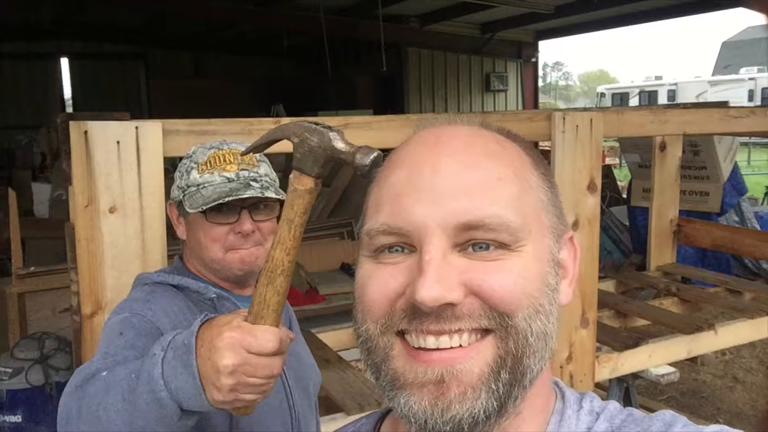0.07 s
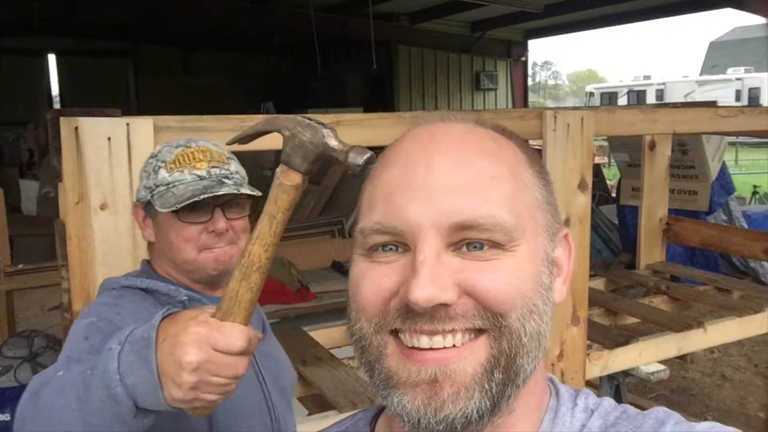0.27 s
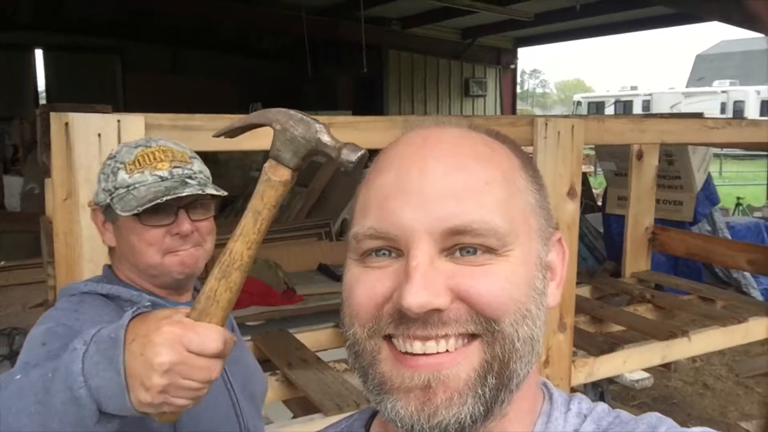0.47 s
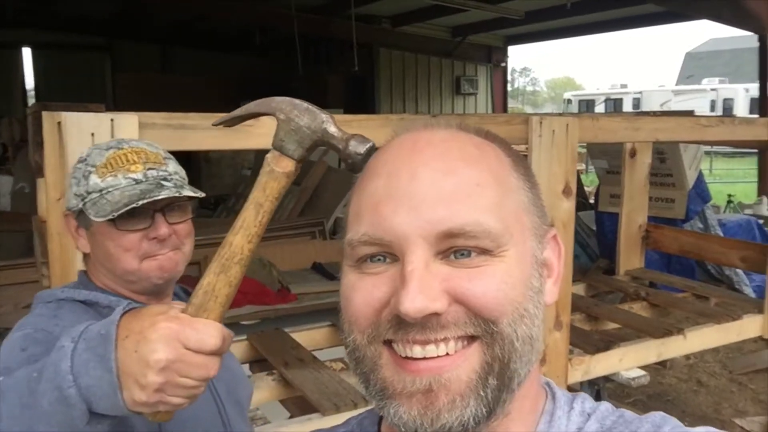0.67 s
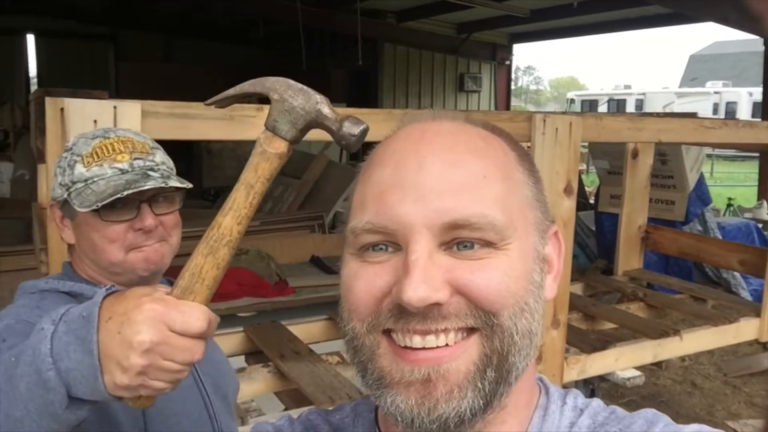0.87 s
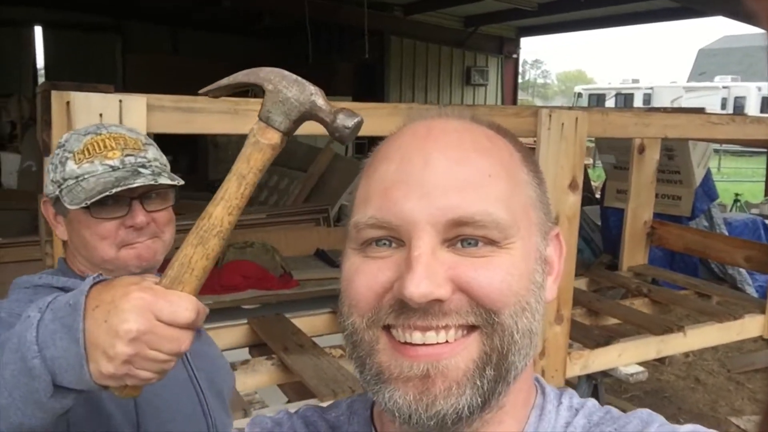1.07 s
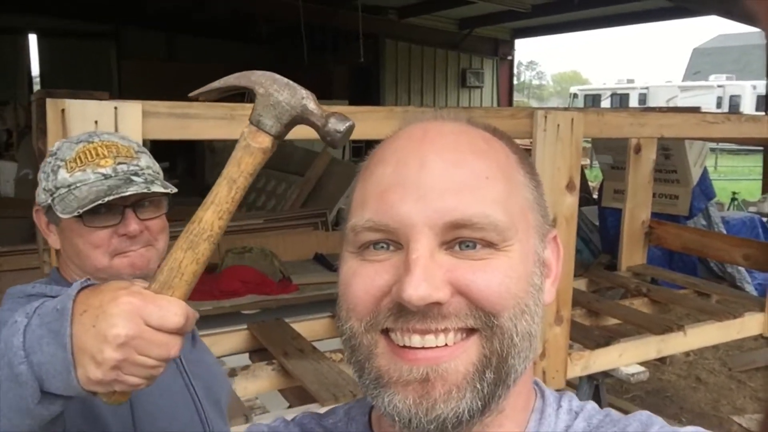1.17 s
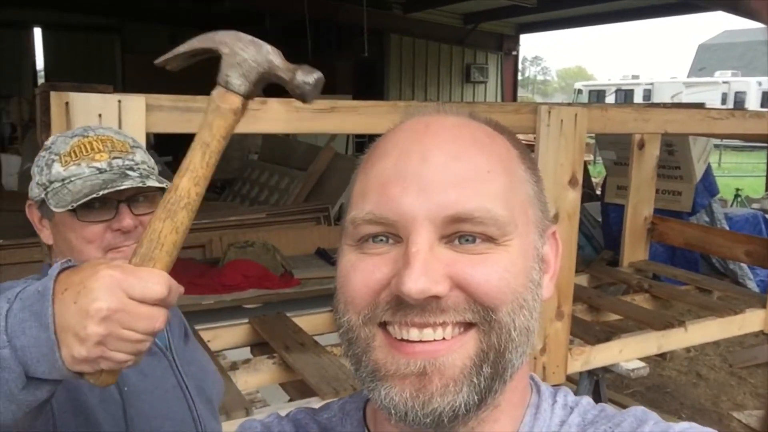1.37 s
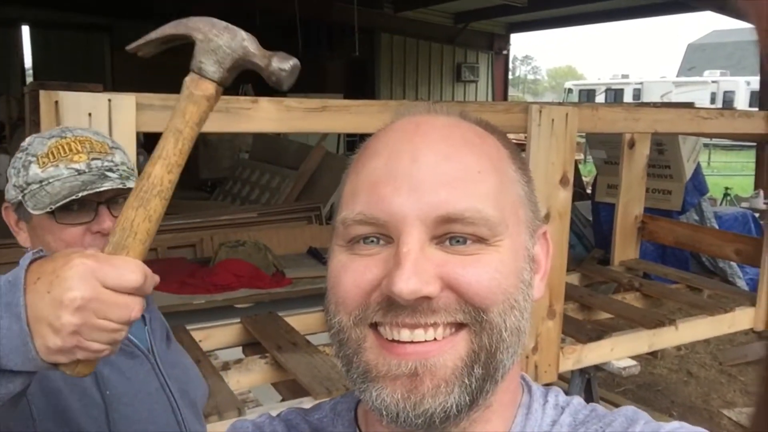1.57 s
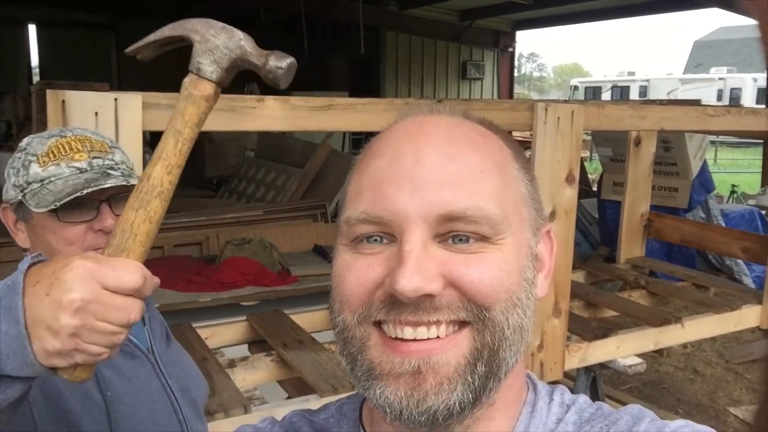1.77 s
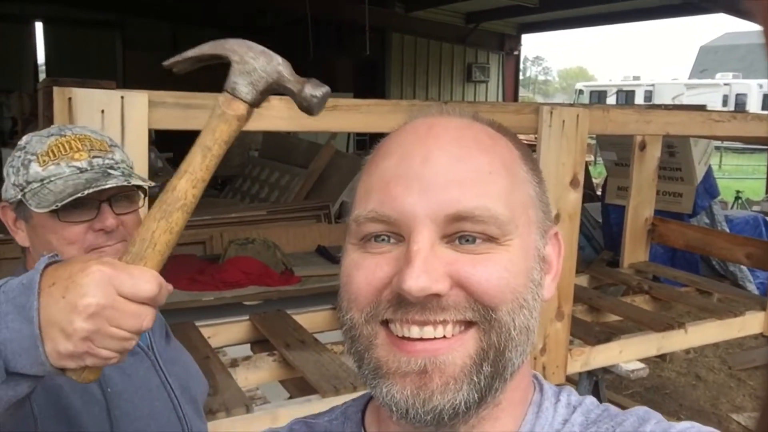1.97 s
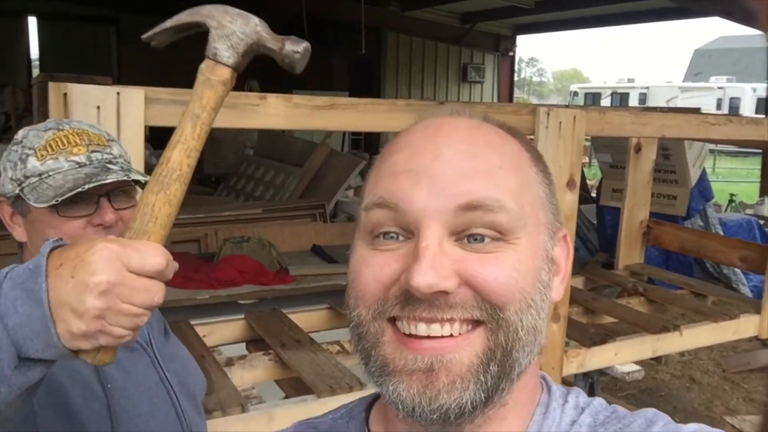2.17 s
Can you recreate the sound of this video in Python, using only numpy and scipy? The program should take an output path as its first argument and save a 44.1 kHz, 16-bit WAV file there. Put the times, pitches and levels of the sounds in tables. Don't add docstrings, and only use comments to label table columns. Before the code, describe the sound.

Water runs and spatters off the eaves throughout, with small bubbling drips and fine hiss. A low lumpy rumble lies beneath, and a single dull thud comes early, picked up by one microphone under the roof.

```python
import sys
import numpy as np
from scipy import signal
from scipy.fft import rfft, irfft, next_fast_len
from scipy.io import wavfile
from scipy.ndimage import uniform_filter1d, map_coordinates

SR = 44100
rng = np.random.default_rng(int(sys.argv[2]) if len(sys.argv) > 2 else 0)


def bounce(signal):
    frames = np.transpose(np.atleast_2d(signal))
    limited = np.clip(frames, -1, 1)
    pcm = np.round(limited * 32767).astype(np.int16)
    wavfile.write(sys.argv[1], SR, pcm)


def boost(x):
    u = np.asarray(x, float) / 20
    return 10 ** u


N = 98254
T = np.arange(N) / SR


def unit(x):
    return x / np.sqrt(np.mean(x ** 2) + 1e-20)


def coloured(x, points):
    m = next_fast_len(N + 8192)
    hz, db = np.transpose(points)
    bins = np.fft.rfftfreq(m, 1 / SR)
    gain = boost(np.interp(np.log(bins + 1), np.log(hz + 1), db))
    return unit(irfft(rfft(x, m) * gain, m)[:N])


def wobble(rate):
    return map_coordinates(rng.standard_normal(2000), [np.clip(T * rate, 0, 1998)])


def patchy(patchy_db):
    z = signal.stft(rng.standard_normal(N + 512), nperseg=512)[2]
    field = uniform_filter1d(rng.standard_normal(z.shape), size=5, axis=0)
    field = uniform_filter1d(field, size=8, axis=1)
    return signal.istft(z * boost(patchy_db * unit(field)), nperseg=512)[1][:N]


def grains(count, hz, spread, cycles, scatter_db, rise):
    at, size = rng.random((2, count, 1))
    pitch = np.clip(hz * np.exp(spread * rng.standard_normal((count, 1))), 100, SR / 2.5)
    k = np.arange(1400)
    u = k / SR * pitch / cycles
    level = boost(-scatter_db * np.log(size + 1e-4))
    tone = np.sin(2 * np.pi * cycles * u * (1 + rise * u))
    wave = level * u * np.exp(-3 * u) * tone
    place = (at * N).astype(int) + k
    return unit(np.bincount(place.ravel(), wave.ravel(), N + k.size)[:N])


def swell(s, length):
    return np.exp(-.5 * ((T - s) / (.5 * length)) ** 2)


def blip(s, hz, db, length, rise):
    t = T - s
    glide = 1 + .5 * rise * np.clip(t / length, -2, 2)
    return boost(db) * swell(s, length) * np.cos(2 * np.pi * hz * t * glide)


def eaves_runoff(strength_db):
    # frequency in Hz, power in dB per Hz.
    runoff_spectrum = [(880, -47), (1500, -6), (1640, -12.5), (1950, 2.5), (2300, 4), (2650, -3),
                       (3970, -23), (5000, -34), (6500, -29), (11000, -120)]
    bubble_db = -6
    froth = coloured(grains(count=700, hz=2927, spread=.35, cycles=151, scatter_db=1.5, rise=0.02),
                     runoff_spectrum)
    splash = coloured(patchy(patchy_db=2.0), runoff_spectrum)
    return unit(splash + boost(bubble_db) * froth) * boost(strength_db + 0.78 * wobble(30.7))


def roof_patter(swing_db):
    # frequency in Hz, power in dB per Hz.
    roof_spectrum = [(110, -6), (190, -14), (209, -2.5), (460, -5.5), (633, -7), (743, -13), (1040, -2),
                     (1640, -13), (1800, -10), (2340, -52), (3960, -120)]
    # centre in seconds, level in dB, length in seconds.
    spills = [(0.246, -56, 0.06), (0.645, -62, 0.044), (0.94, -57, 0.032), (1.059, -55, 0.048),
              (1.135, -63, 0.052), (1.216, -58, 0.2), (1.47, -56.5, 0.025), (1.596, -51, 0.022),
              (1.687, -50, 0.018), (1.737, -53.5, 0.071), (1.915, -57.5, 0.059), (1.982, -55.5, 0.06)]
    roof_db, follows = -56, 0.42
    patter_db = -6.5
    patter = grains(count=1200, hz=807.6, spread=0.5554, cycles=19.0, scatter_db=2.5, rise=0.027)
    sheet = unit(coloured(patchy(patchy_db=2.5), roof_spectrum) + boost(patter_db) * patter)
    drumming = boost(2 * (roof_db + follows * swing_db))
    drumming = drumming + sum(boost(2 * db) * swell(s, length) ** 2 for s, db, length in spills)
    return sheet * np.sqrt(drumming)


def far_hiss(swing_db):
    # frequency in Hz, power in dB per Hz.
    hiss_spectrum = [(2500, -33), (4300, -7.5), (4900, -8), (6200, 2), (7000, -4.5), (9600, -6),
                     (10400, -10), (11900, -8.5), (15700, -17)]
    hiss_db, follows, flicker_db = -71, .25, .6
    tick_db = -23
    ticks = coloured(grains(count=1500, hz=9500, spread=0.84, cycles=13.0, scatter_db=3, rise=0.018),
                     hiss_spectrum)
    haze = unit(coloured(patchy(patchy_db=1.0), hiss_spectrum) + boost(tick_db) * ticks)
    return haze * boost(hiss_db + follows * swing_db + flicker_db * wobble(25.27))


def rain():
    # time in seconds, runoff strength in dB.
    rain_strength = [(0.2, -51), (0.24, -53), (0.5, -56.5), (0.54, -52), (0.62, -56.5), (0.72, -54),
                     (0.83, -58), (0.92, -53.5), (1.05, -57), (1.09, -53.5), (1.13, -54), (1.65, -54),
                     (1.67, -48.5), (1.77, -55.5), (1.97, -53), (2.07, -59.5), (2.1, -52), (2.22, -56.5)]
    s, db = np.transpose(rain_strength)
    strength_db = np.interp(T, s, db)
    swing_db = strength_db - strength_db.mean()
    return eaves_runoff(strength_db) + roof_patter(swing_db) + far_hiss(swing_db)


def rumble():
    # frequency in Hz, power in dB per Hz.
    rumble_spectrum = [(15, -41), (27, -21), (42, -3), (62, 1), (100, -5), (135, -8), (173, -9), (230, -23),
                       (400, -120)]
    # centre in seconds, pitch in Hz, level in dB.
    booms = [(0.181, 134.5, -47.5), (0.279, 100, -49), (0.359, 67.8, -38.5), (0.416, 73.5, -42),
             (0.437, 86, -43), (0.46, 135.5, -47), (0.581, 92.5, -48), (0.6, 188, -52), (0.655, 61, -51),
             (0.699, 165.5, -55.5), (0.705, 73.4, -44), (0.867, 74.4, -52.5), (0.915, 73.5, -45.5),
             (0.939, 174, -55.5), (0.999, 73.5, -47), (1.235, 77, -43.5), (1.291, 118, -51),
             (1.381, 87, -56), (1.464, 64.6, -49), (1.634, 60.7, -47.5), (1.704, 182, -52.5),
             (1.714, 89, -48), (1.761, 64, -49.5), (1.786, 118, -49.5), (1.955, 170, -50.5),
             (1.97, 88, -53), (2.018, 53.7, -50), (2.032, 168, -52), (2.051, 86, -47), (2.108, 67, -49),
             (2.188, 89.5, -51), (2.215, 167, -51),
             (0.213, 60, -45.5), (0.321, 104.0, -56), (0.471, 108, -48), (0.545, 112.0, -54.5),
               (0.604, 118.0, -51.5), (0.654, 56, -56), (0.71, 70, -46), (0.779, 107, -52.5),
               (0.935, 168, -52), (1.024, 165, -56), (1.069, 138, -56), (1.125, 151.0, -62),
               (1.17, 172.0, -64), (1.183, 127.0, -56), (1.277, 163, -53), (1.377, 78.5, -49),
               (1.447, 162, -59), (1.466, 118.0, -60.5), (1.479, 163.0, -56.5), (1.758, 191, -66),
               (1.923, 133, -60), (2.213, 140.0, -51.5)]
    bed_db, lumps_db, evenness = -53.5, 0.7, 0.67
    boom_s, boom_gain_db = 0.023, 2.5
    bed = coloured(rng.standard_normal(N), rumble_spectrum)
    local_power = np.abs(uniform_filter1d(bed ** 2, size=2500)) + 0.039
    bed = bed / local_power ** (evenness / 2)
    bed = unit(bed * boost(lumps_db * wobble(39))) * boost(bed_db)
    return bed + sum(blip(s, hz, db + boom_gain_db, boom_s, 0) for s, hz, db in booms)


def bubbles():
    # centre in seconds, pitch in Hz, level in dB.
    small_drips = [(0.19, 2320, -51), (0.545, 2130, -43), (0.878, 1830, -49), (0.884, 2276, -46.5),
                   (0.892, 1940, -51), (0.952, 2160, -51), (0.734, 2540, -48.5), (0.67, 2510, -53),
                   (0.202, 3620, -58), (0.537, 1940, -46.5), (0.559, 2550, -46.5), (0.821, 3575, -69),
                   (0.858, 3187, -60), (0.896, 3150, -69), (0.914, 2760, -64), (0.95, 2640, -48),
                   (1.09, 2624, -44.5), (1.109, 3176, -55.5), (1.114, 2740, -48), (1.209, 3047, -69),
                   (1.246, 2750, -49.5), (1.67, 2630, -59), (1.678, 1940, -49), (1.685, 3500, -64),
                   (1.697, 2960, -59), (1.722, 2490, -47), (1.778, 3700, -65), (1.79, 3700, -65)]
    # centre in seconds, pitch in Hz,
    # level in dB.
    big_plops = [(0.3, 366, -51.5), (0.332, 657, -49), (0.524, 1840, -51), (0.811, 1475, -54),
                 (0.93, 1420, -53), (1.078, 837, -51.5), (1.106, 644, -52), (1.135, 355, -48.5),
                 (1.222, 632, -50), (1.261, 1760, -55), (1.508, 1410, -52), (1.602, 355, -45.5),
                 (1.67, 996, -49), (1.704, 885, -50.5), (1.711, 626, -51.5), (1.728, 814, -49),
                 (1.924, 1420, -52.5), (1.933, 794, -55), (1.949, 640, -52), (2.145, 1185, -51),
                 (0.194, 1700.0, -59), (0.243, 647, -56), (0.25, 980, -50), (0.274, 400.0, -49),
                  (0.332, 1480, -56.0), (0.362, 1405, -55), (0.531, 437, -52), (0.569, 217.0, -51),
                  (0.756, 280, -56), (1.09, 537, -53.0), (1.153, 680, -53), (1.201, 925, -50),
                  (1.318, 336, -53), (1.444, 1100.0, -53), (1.477, 750, -59), (1.479, 1710, -54),
                  (1.691, 284, -47.5), (1.747, 675.0, -52.0), (1.765, 1380, -54), (1.877, 373, -56),
                  (1.897, 710, -53.5), (1.951, 460, -50.5), (1.954, 1370.0, -54), (1.993, 227, -48.5),
                  (1.998, 1290.0, -51), (2.061, 870, -56), (2.128, 1497, -57.0), (2.203, 820, -54)]
    rise, flutter_db = .012, 3
    drip_s, drip_gain_db = .012, -5
    plop_s, plop_gain_db = .015, -3
    plops = sum(blip(s, hz, db + plop_gain_db, plop_s, rise) for s, hz, db in big_plops)
    drips = sum(blip(s, hz, db + drip_gain_db, drip_s, rise) for s, hz, db in small_drips)
    return plops * boost(flutter_db * wobble(90)) + drips * boost(flutter_db * wobble(160))


def sprays():
    # start in seconds, level in dB, centre in Hz, length in seconds, width in octaves.
    near_sprays = [(0.205, -72.5, 9100, .083, 0.24), (.214, -73, 11800, .003, .1),
                   (.218, -70, 9600, .012, .05), (0.241, -70, 9650, 0.014, .05),
                   (0.25, -68, 6100, .012, .05), (0.335, -62, 8150, 0.0078, .3),
                   (.336, -74, 9560, 0.031, 0.046), (0.793, -68.5, 3520, 0.058, 0.045),
                   (0.84, -70, 8500, .032, .39), (0.84, -70.5, 6300, .049, .05),
                   (.842, -69, 10000, .003, .08), (0.846, -66, 3250, .04, 0.068),
                   (0.868, -69, 6070, .016, 0.054), (0.878, -69, 9500, 0.044, 0.39),
                   (0.873, -67, 9800, 0.0027, .06), (.886, -71, 14200, .003, .08),
                   (0.89, -69, 12000, .012, .05), (.899, -67, 12200, .005, .04),
                   (0.905, -66, 9800, .003, .1), (1.02, -70, 8800, .008, .15),
                   (1.098, -67, 7900, .0084, .06), (1.103, -68.5, 6000, .015, .04),
                   (1.139, -68, 8200, 0.012, 0.17), (1.664, -61.5, 7160, .009, 0.25),
                   (1.75, -68, 6560, .014, .2), (1.95, -71.5, 6900, 0.075, .3),
                   (1.979, -73, 8500, 0.014, .2), (2.083, -69.5, 6360, .03, .06),
                   (2.102, -61, 8700, .003, .08), (2.106, -61.5, 8300, 0.013, .22),
                   (2.108, -68, 3600, .03, .12)]
    rise_s, grain_db = 0.0012, 3
    out = np.zeros(N)
    step = np.arange(-4, 5)
    for s, db, hz, length, octaves in near_sprays:
        t = np.maximum(T - s, 0)
        band = np.c_[hz * 2. ** (step * octaves), -4.3 * step ** 2]
        puff = coloured(rng.standard_normal(N), band)
        envelope = (1 - np.exp(-t / rise_s)) * np.exp(-t / length)
        out += boost(db + grain_db * wobble(350)) * puff * envelope
    return out


def knock():
    # pitch in Hz, level in dB, length in seconds, lag in seconds.
    plank = [
        (102.5, -33.5, 0.021, 0),
        (226, -39.5, 0.01, .0012),
        (460, -51, 0.0146, -.011),
        (700, -56, 0.015, -.006),
    ]
    knock_s = .249
    return sum(blip(knock_s + lag, hz, db, length, 0) for hz, db, length, lag in plank)


def scene():
    return (rain() + rumble() + bubbles() + sprays() + knock())[None]


def top_cut(x):
    return signal.sosfilt(signal.butter(12, 15680, fs=SR, output="sos"), x)


def record(dry):
    fade_start_s, fade_s, fade_curve = 0.1205, 0.065, 1.2
    fade = np.clip((T - fade_start_s) / fade_s, 0, 1) ** fade_curve
    return top_cut(dry * fade)


dry = scene()
out = record(dry)
bounce(out)
```